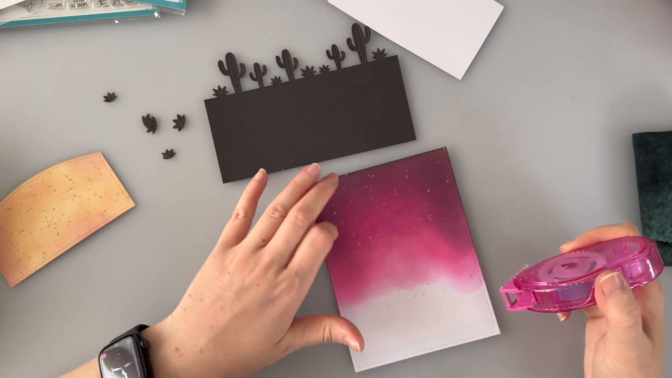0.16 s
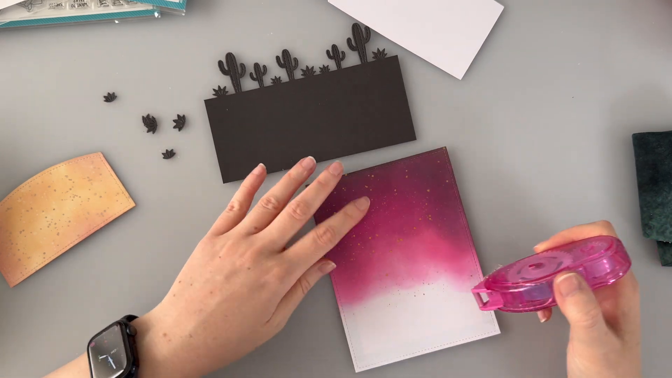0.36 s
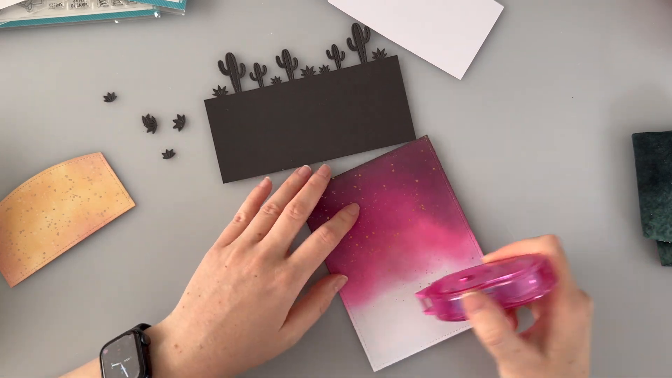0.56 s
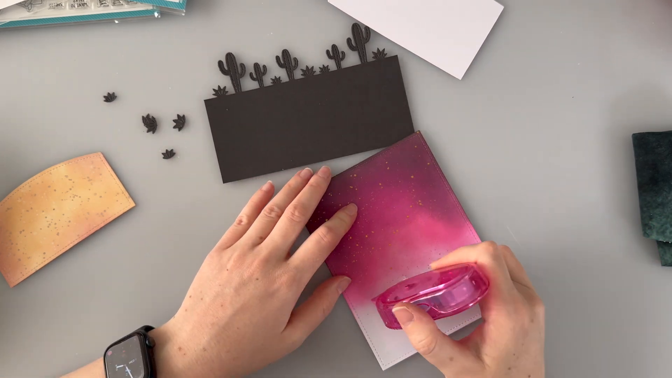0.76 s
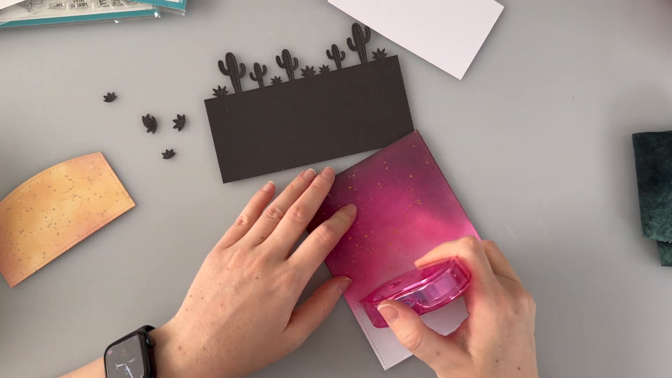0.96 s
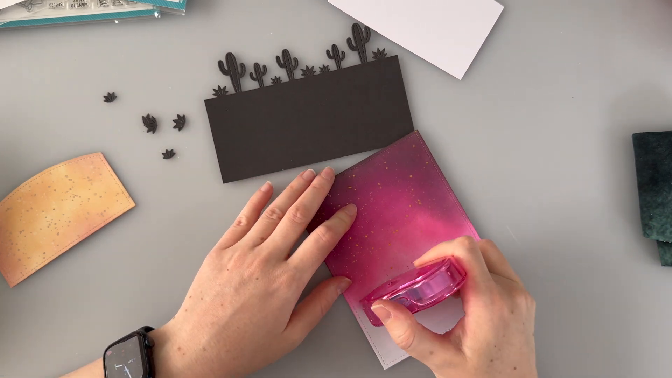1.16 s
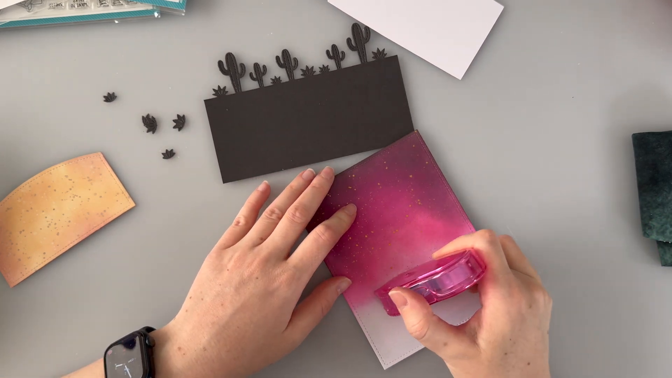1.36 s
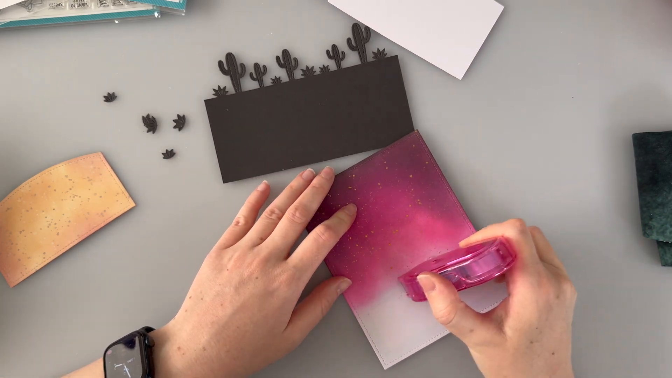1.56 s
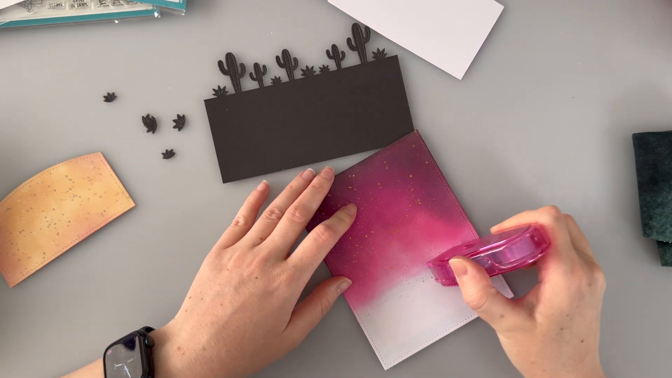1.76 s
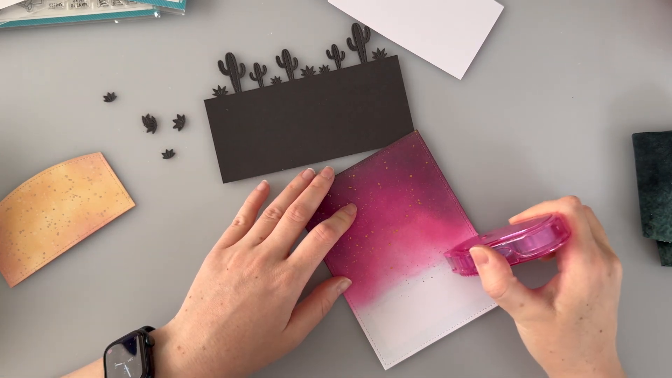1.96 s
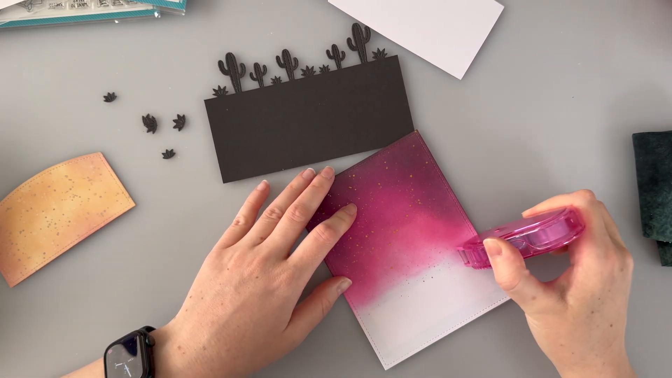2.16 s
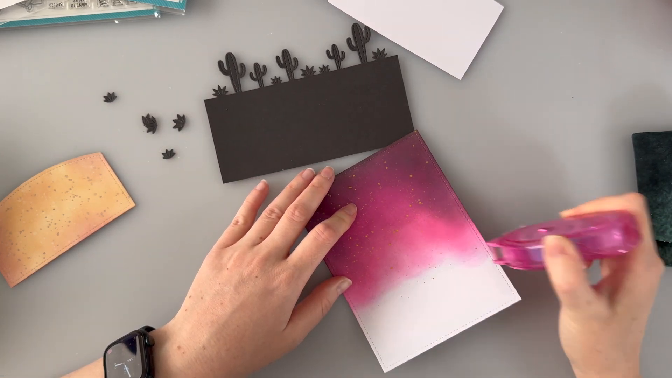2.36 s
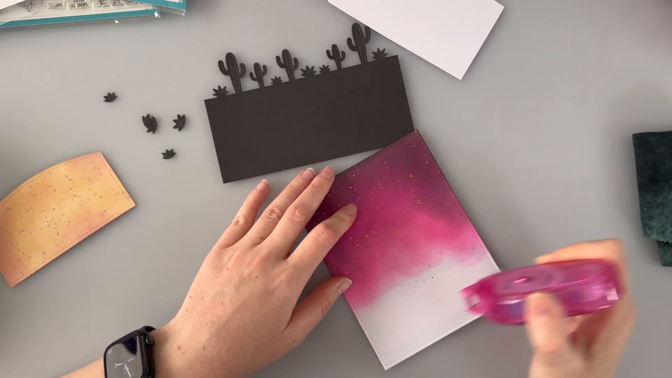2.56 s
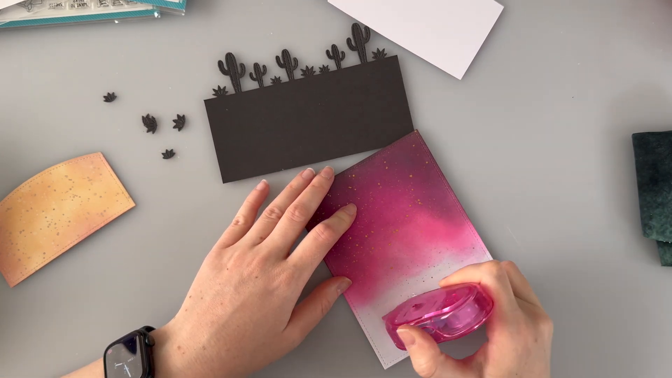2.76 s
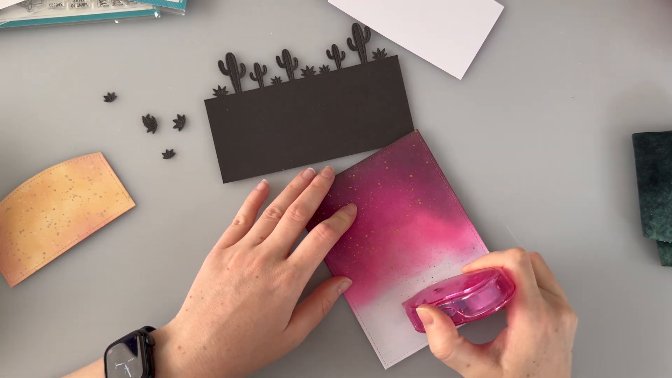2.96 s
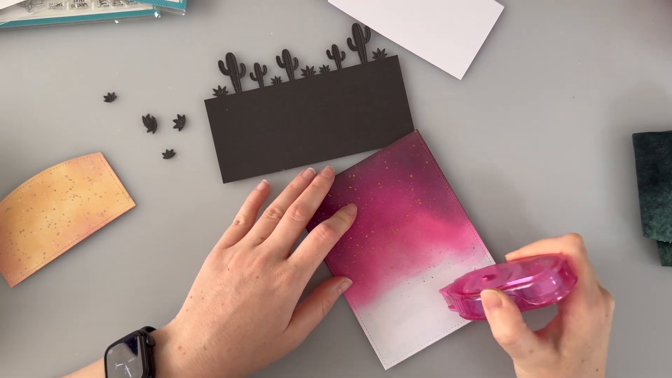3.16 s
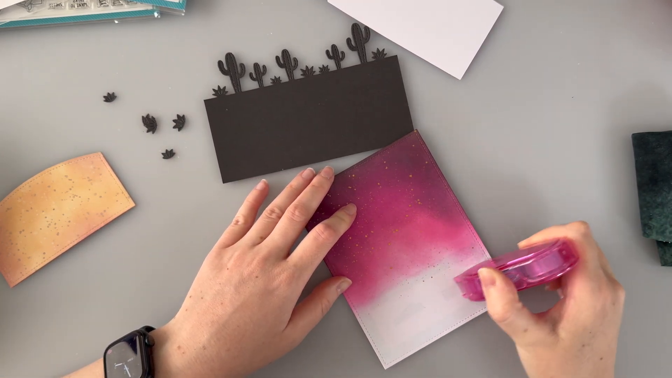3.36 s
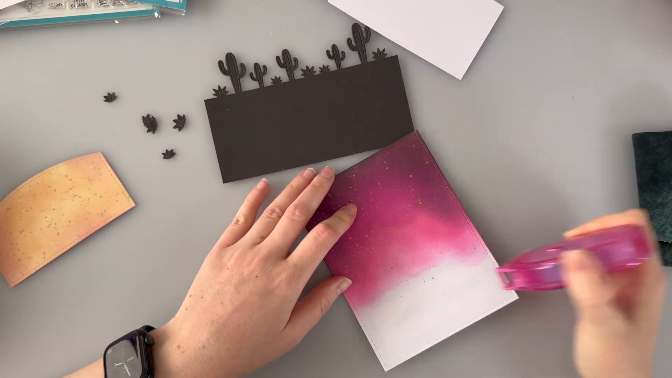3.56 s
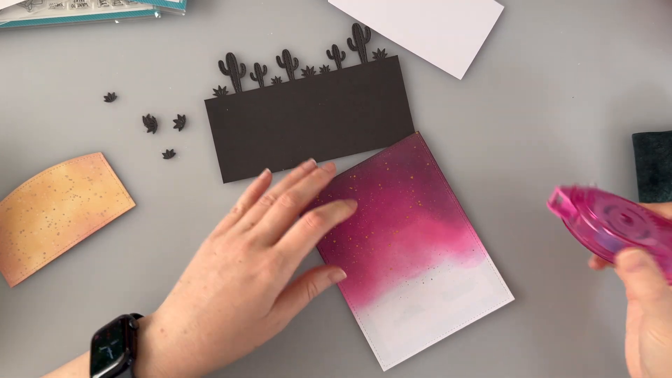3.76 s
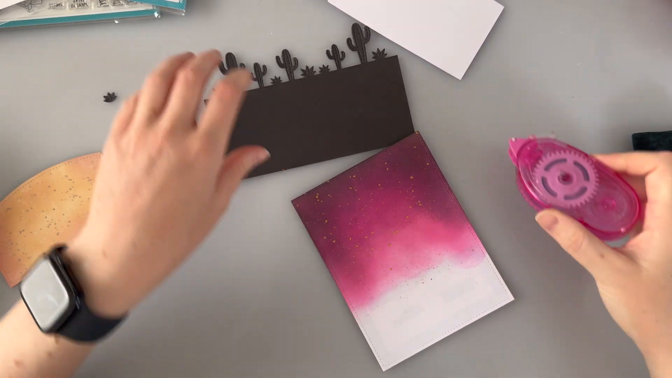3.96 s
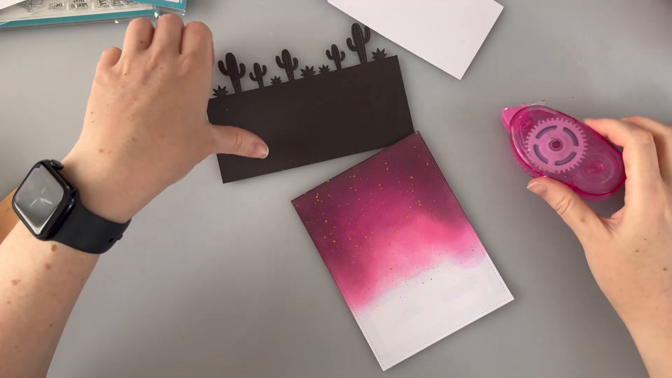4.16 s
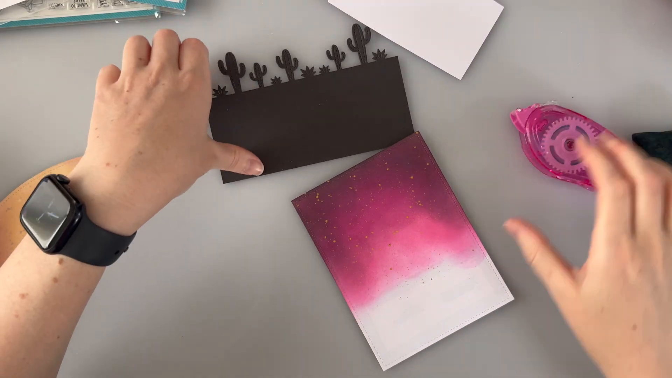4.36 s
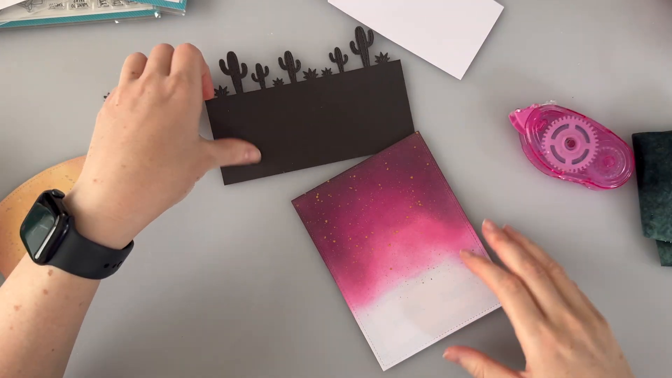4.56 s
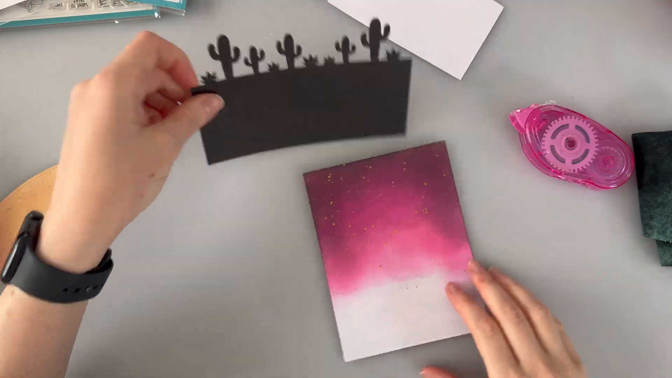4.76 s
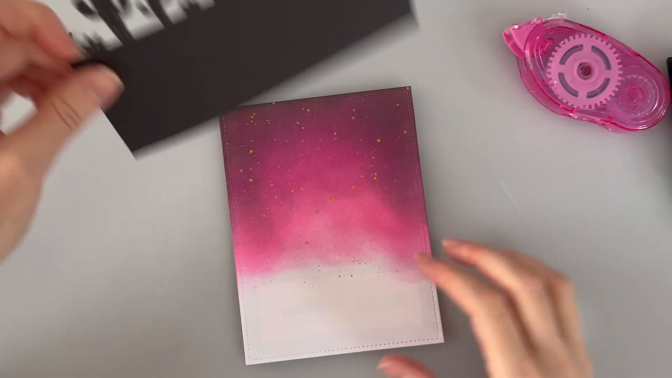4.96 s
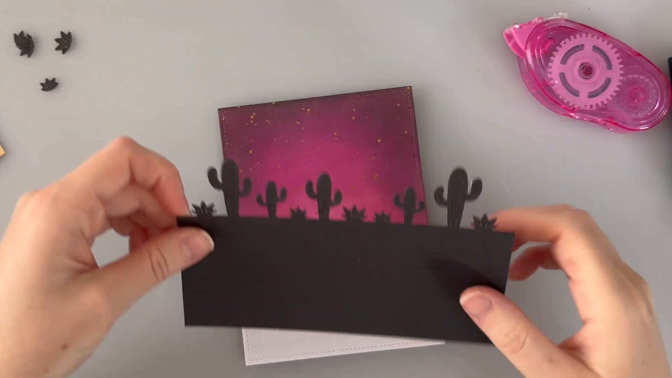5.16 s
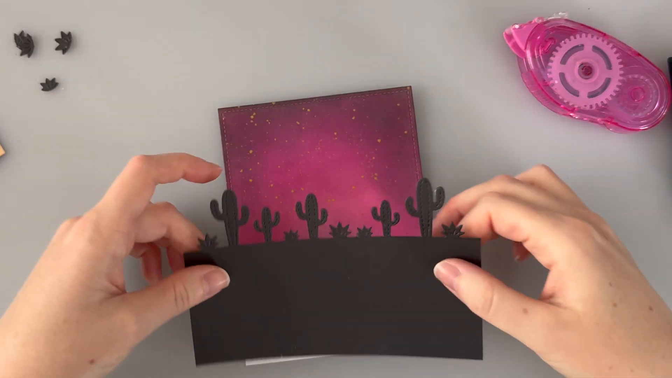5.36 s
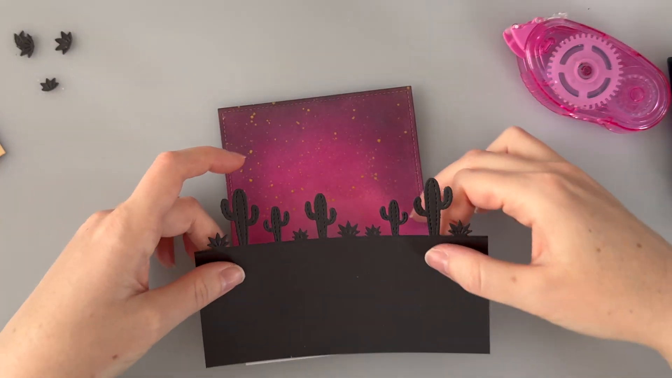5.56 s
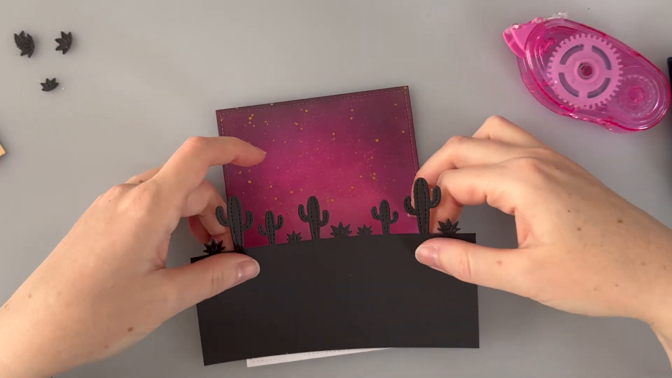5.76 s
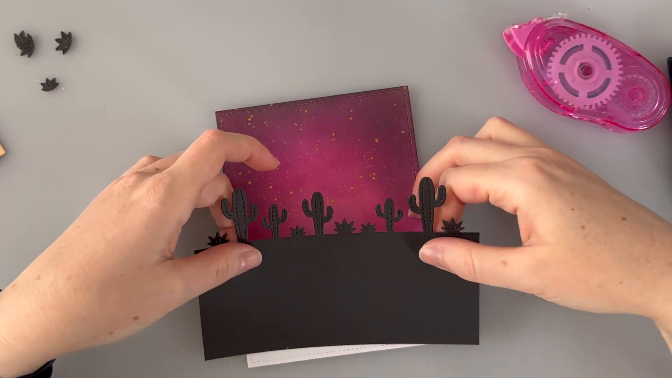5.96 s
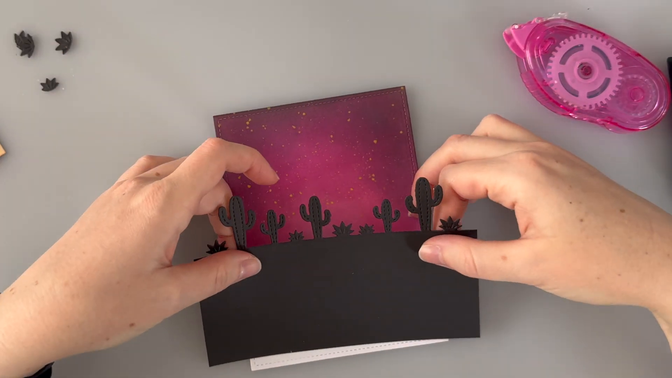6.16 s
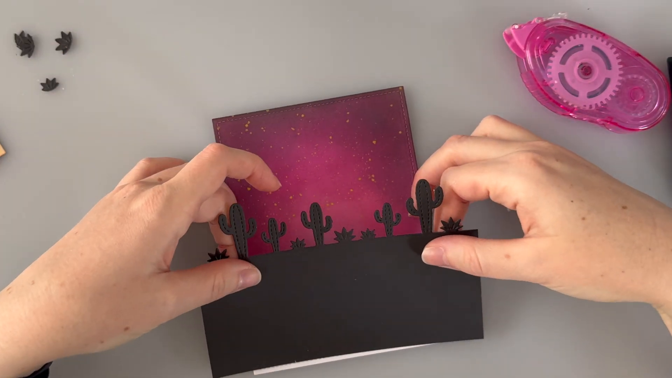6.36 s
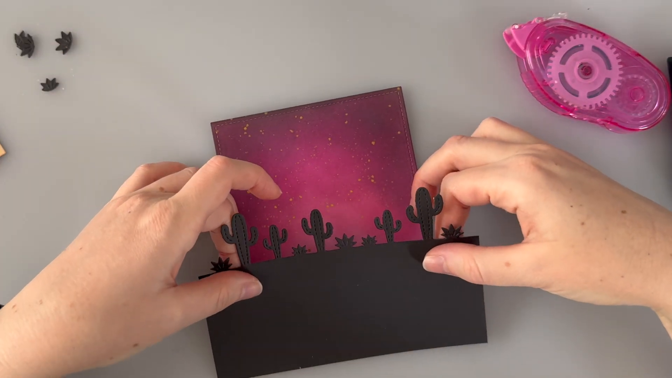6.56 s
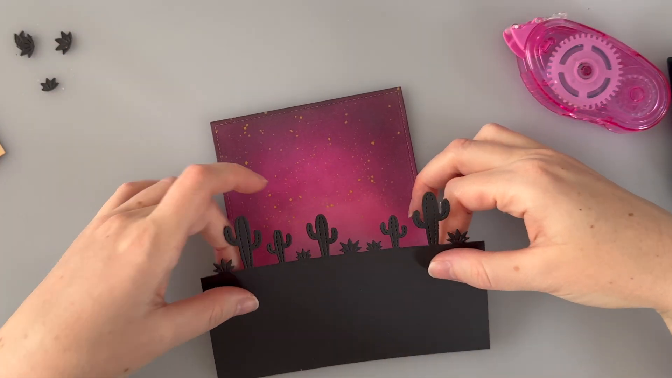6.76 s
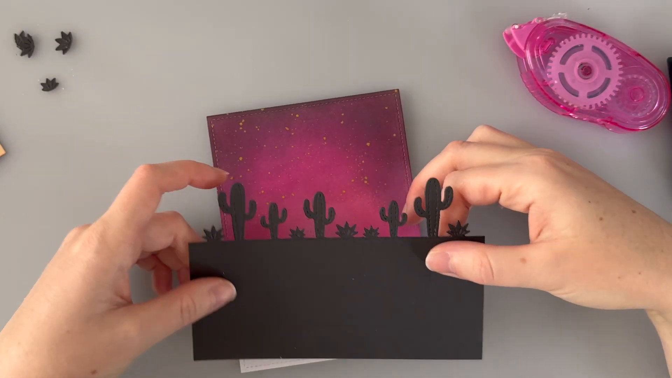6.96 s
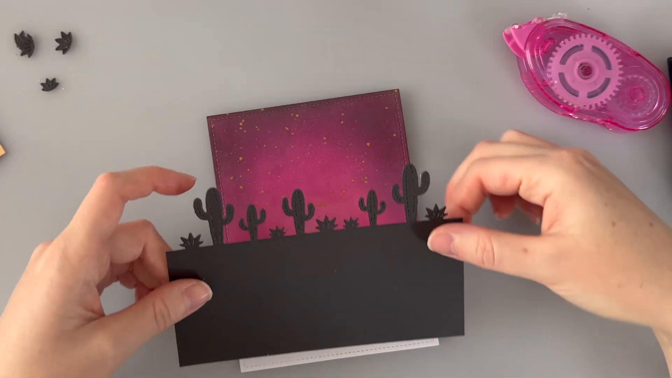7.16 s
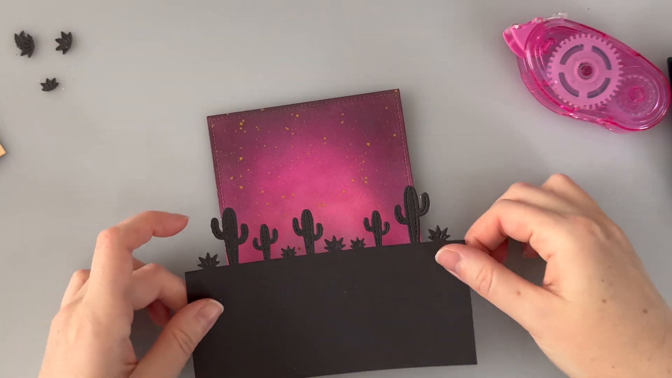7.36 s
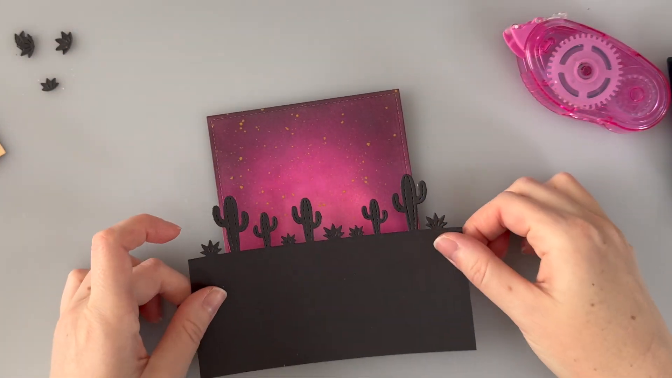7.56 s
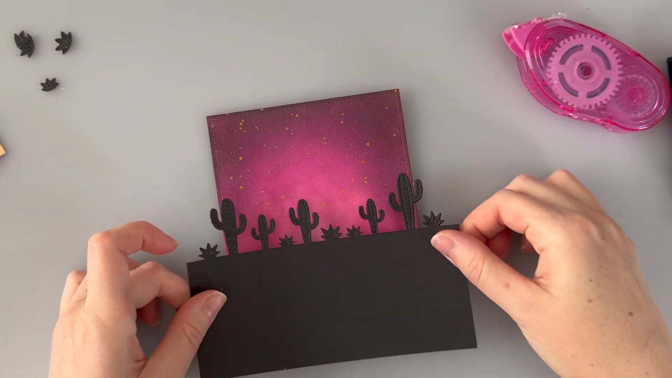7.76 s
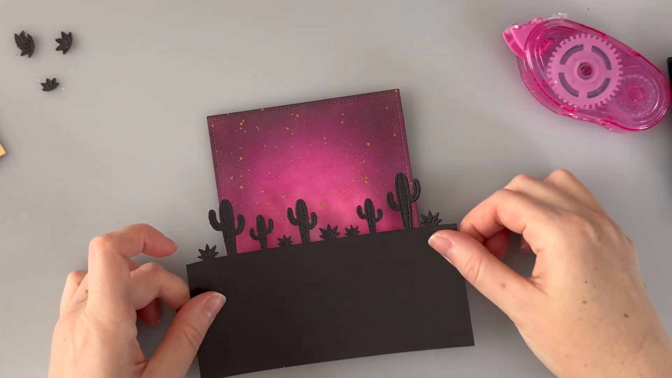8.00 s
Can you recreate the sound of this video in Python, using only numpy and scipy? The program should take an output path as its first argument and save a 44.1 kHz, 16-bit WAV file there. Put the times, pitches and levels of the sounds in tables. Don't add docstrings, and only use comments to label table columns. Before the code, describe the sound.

Indoors at a craft table, faint low air noise throughout. Paper brushes briefly aside, then very sharp, dry plastic clicks accelerate into a zipping ratchet, slow, and repeat in two shorter bursts with small knocks between. Hollow plastic with loose reels clatters onto the tabletop. Then thin card lifts, taps and slides gently, recorded close with a short room response.

```python
import sys
import numpy as np
from scipy import signal
from scipy.fft import rfft, irfft, next_fast_len
from scipy.io import wavfile
from scipy.ndimage import uniform_filter1d, map_coordinates

SR = 44100
rng = np.random.default_rng(int(sys.argv[2]) if len(sys.argv) > 2 else 0)


def store_pcm(level_fs):
    pcm = np.round(np.clip(level_fs, -1, 1) * 32767).astype(np.int16)
    wavfile.write(sys.argv[1], SR, np.atleast_2d(pcm).T)


def voltage_ratio(decibels):
    exponent = np.asarray(decibels, float) / 20
    return 10 ** exponent


N = 354123

# frequency_hz, density_db (per hertz)
RUMBLE_SPECTRUM = [(12, -36), (20, -9.5), (43, -5), (118, -2.5), (272, -11), (303, -9), (327, -15.5),
                   (445, -23), (511, -28.5), (800, -34), (1040, -72.5), (1760, -120)]
# frequency_hz, width_hz, level_db (over the rumble)
FAN_HUMS = [(301, 4.2, -12.5), (445, 29, -16.5)]
# frequency_hz, level_db
HISS_SPECTRUM = [(300, 3), (600, 2), (1500, -4), (3200, -9.5), (5500, -13.5), (8000, -10.5), (11000, -14),
                 (14000, -15), (15600, -23)]
# start_s, length_s, level_db
LEANS = [
    (-.2, 0.75, -53.5),
    (0.355, 0.83, -57.5),
    (1.037, 1.59, -50),
    (2.742, 0.59, -49.5),
    (3.215, 0.36, -51),
    (4.181, 0.96, -51.5),
    (5.015, 0.86, -54.5),
    (5.815, 1.28, -59),
    (6.812, 0.82, -57.5),
]
# start_s, length_s
DUCKS = [
    (2.3, 0.66),
    (3.0, .3),
    (3.5, .8),
]

# start_s, peak_db, pitch_hz, t60_s
DESK_THUMPS = [(1.9141, -28, 100, 0.08), (1.958, -37.5, 110.3, .06), (2.241, -40, 99, 0.1),
               (2.757, -40, 137.5, 0.17), (3.244, -38.5, 159, 0.11), (3.421, -38.5, 181, .06),
               (3.497, -36.5, 199, .06), (3.528, -38.5, 108, 0.057), (4.147, -44.5, 136, 0.16),
               (4.289, -29.5, 169, 0.084), (4.345, -39.5, 124, 0.24), (4.267, -42.5, 260, .05),
               (4.321, -40.5, 200, .06), (4.362, -41.5, 140, .07), (4.414, -47, 170, .06),
               (4.44, -48.5, 190, .06)]

# start_s, length_s, body_db, hiss_db (over body), free_span_hz
TURN_SLIDES = [
    (-0.12, 0.32, -56.5, -2, 1730),
    (.43, .1, -72.5, 1, 1740),
    (.62, 0.093, -71.5, 0.5, 4950),
]
TURN_FLICKS = [
    (0.407, 0.11, -67, -1.5, 1740),
]
# frequency_hz, level_db
SHEET_SPECTRUM = [(700, -18), (1300, -4.5), (1750, -9.5), (2300, -2.5), (3800, -9), (4850, -3),
                  (5600, -16.5), (8000, -40)]
# start_s, length_s, body_db, hiss_db (over body), free_span_hz
CARD_SLIDES = [(2.07, 0.094, -73, 19, 3676), (2.18, 0.097, -48, 5, 3410), (4.64, 0.14, -45.5, -24, 2297),
               (4.7, .2, -56.5, 2, 2220), (5.38, .14, -75, 10, 3187), (5.9, 1.9, -72, -4.5, 2500),
               (6.12, 0.1, -62.5, -25, 2460), (6.3, 0.13, -66.5, -17, 2440), (6.55, 0.16, -71, -10.5, 2520),
               (6.71, 0.066, -68, -12.5, 1598), (6.74, 0.096, -59, -7, 2940), (6.85, 0.098, -72, 7, 2300),
               (6.98, .16, -64, 2.5, 1480), (7.17, 0.19, -63, -2, 2150), (7.5, 0.084, -57.5, -19.5, 2890)]
CARD_FLICKS = [(4.531, 0.33, -61, 15, 4055), (5.092, 0.04, -56, -3.5, 3507), (5.215, 0.24, -65.5, 3, 1866),
               (5.34, 0.22, -58.5, -10, 3760), (5.52, 0.042, -71, -18, 1794), (5.57, 0.29, -64, -5, 3420),
               (5.66, 0.26, -77, -14.5, 2520), (6.015, 0.075, -60.5, -28, 2650),
               (6.488, 0.096, -65.5, -10, 2680), (6.96, 0.03, -62, 0, 1990), (7.39, 0.05, -63, -8, 2356),
               (7.506, 0.069, -58.5, -15, 2840)]
# frequency_hz, level_db
CARD_SPECTRUM = [(600, -28), (900, -8), (1800, -4.5), (2600, -5.5), (3600, -6.5), (4800, -10), (6000, -20),
                 (8000, -30.5)]
# frequency_hz, level_db
FIBRE_SPECTRUM = [(4000, -30), (6000, -7), (8300, 0), (10500, -4), (13000, -.5), (15400, -2.5),
                  (16300, -40)]
SLIDE_PEAK, FLICK_PEAK, STROKE_STEEP = 0.73, 0.17, 1.77

# start_s, length_s, level_db
TIP_PRESSES = [
    (1.15, 0.94, -56.5),
    (2.8, 0.23, -61.5),
    (3.37, 0.49, -62.5),
    (1.7, 0.07, -55),
    (3.45, 0.1, -55),
]
# frequency_hz, level_db
DRAG_SPECTRUM = [(150, -33), (300, 4), (600, -8), (1000, -10.5), (2500, -11), (6000, -15.5), (15000, -19)]

# start_s, peak_db, brightness_db, depth_db, t60_s
CARD_TAPS = [(0.412, -53, 1, 3, 0.0085), (1.0266, -53, -14.5, -23, 0.022), (1.0485, -58.5, -34, 2, 0.028),
             (1.0998, -61, -29, -12.5, 0.027), (4.5977, -49, -10.5, -3, 0.049),
             (4.6399, -30, -9.5, -28, 0.034), (5.101, -43.5, -6.5, -6.5, 0.019),
             (5.2161, -32.5, -11, -4.5, 0.0041), (5.2374, -67, 0, 16, 0.028), (5.2659, -57.5, 5, 13, 0.017),
             (5.5205, -57, -10, 5.5, 0.024), (5.5724, -49.5, -19, -22, 0.055),
             (5.5913, -72, 12, -17.5, 0.014), (5.7048, -52.5, -3, -1, 0.019), (5.7896, -70, 1, 3, 0.02)]
SHELL_CONTACTS = [(2.1606, -43, 2.5, -25.5, 0.0088), (2.3402, -34, -2.5, -10.5, 0.008),
                  (2.345, -29.5, -2, -5, 0.012), (2.7517, -37, -19.5, -2, 0.035),
                  (2.762, -34.5, -4.5, -7, 0.05), (3.24, -32.5, -18.5, -9.5, 0.039),
                  (3.2505, -43, 6.5, 6, 0.02), (3.7004, -46.5, -30, -24, 0.02),
                  (3.747, -36.5, -19, -34, 0.017), (3.8208, -53, -40.5, -0.5, 0.0194),
                  (3.9717, -60, -29.5, 9.5, 0.019), (4.1475, -23, -14, -5, 0.034),
                  (4.1663, -29.5, -12, 1, 0.023), (4.2664, -23.5, -12.5, -14, 0.06),
                  (4.2859, -19, -9, -18.5, 0.05), (4.2945, -14.5, -6, -14.5, 0.054),
                  (4.3203, -18.5, -12.5, -9, 0.022), (4.3385, -22, -6, -15, 0.03),
                  (4.3488, -31.5, -9, -12, 0.02), (4.407, -28.5, -16.5, -14, 0.023)]
PAWL_NUDGES = [
    (2.216, -48, 6, -15, .02),
    (2.231, -48, 8, -15, .02),
]
# frequency_hz, width_hz, level_db
SHELL_ON_DESK = [(1850, 550, 0.5), (3040, 410, -1), (3600, 84, 4), (4483, 2200, -4), (5200, 1100, -11.5)]

# start_s, peak_db, pitch_hz, t60_s
REEL_TICKS = [(1.9155, -34.5, 760, .012), (1.959, -27, 621, 0.015), (1.989, -30, 650, .014),
              (2.0085, -28, 693, 0.012), (2.04, -28.5, 600, 0.011), (3.533, -23, 920, 0.016),
              (3.966, -54.5, 1504, .008), (4.17, -36, 1500, 0.026), (4.33, -26.5, 1414, .03),
              (7.54, -49, 2920, 0.036), (2.341, -17, 3740, 0.0045), (2.3455, -24.5, 3400, 0.0056),
              (2.3535, -35, 3230, .006), (2.3564, -25, 2940, 0.005), (2.366, -17.5, 1920, 0.00307),
              (2.755, -45.5, 888, 0.012), (3.234, -34, 4310, 0.0054), (3.2399, -27.5, 1780, .014),
              (3.2461, -23, 1280, 0.0097), (3.2535, -28, 3490, 0.0065), (3.2609, -30.5, 1430, 0.017),
              (3.546, -22, 3800, 0.0051), (3.5518, -28, 3400, .006), (3.559, -28, 2960, 0.00585),
              (3.8206, -43.5, 1940, 0.01), (3.943, -56, 1443, 0.0091), (3.9725, -45, 1310, .015),
              (4.0023, -54.5, 1147, .012), (4.149, -23.5, 1275, .03), (4.1495, -23.5, 1902, 0.02),
              (4.211, -37.5, 1267, .03), (4.267, -29, 1150, .02), (4.276, -25, 4387, 0.011),
              (4.2868, -17, 4300, 0.0083), (4.292, -17, 2430, 0.0042), (4.2953, -12, 1870, 0.02),
              (4.2968, -13, 3065, 0.017), (4.3035, -22, 2193, .012), (4.321, -23, 1950, 0.0095),
              (4.3355, -21.5, 2134, 0.0077), (4.3383, -19.5, 1855, .014), (4.341, -21.5, 3133, .012),
              (4.349, -24, 1890, .012), (4.4, -26.5, 1850, 0.017), (4.4065, -26.5, 2896, 0.0105),
              (4.686, -42, 2130, 0.06), (4.722, -40, 2400, 0.03), (4.732, -37, 2830, 0.04),
              (4.735, -36.5, 2060, 0.038), (4.735, -47, 890, 0.036), (7.067, -50, 1726, 0.056),
              (5.271, -46, 1010, 0.024), (.333, -64, 2080, .02), (2.563, -63.5, 2298, .015),
              (3.213, -53, 2000, .012)]

# start_s, snap_db, faces_db, rim_db, cavity_db
LONG_PULL = [(1.205, -11.5, -29, -29.5, -26), (1.263, -7.5, -28, -26.5, -27.5),
             (1.3006, -9.5, -35, -24, -26), (1.342, -8, -26.5, -24.5, -26),
             (1.3631, -11.5, -26, -24.5, -29), (1.3833, -8, -23.5, -23.5, -29.5),
             (1.405, -9, -25.5, -26, -28.5), (1.4376, -8.5, -27.5, -22.5, -26),
             (1.4672, -8.5, -26.0, -26, -29.5), (1.5004, -6, -24.5, -24.5, -25),
             (1.5194, -11.5, -23, -28, -21), (1.5403, -9.5, -21, -23, -22.5),
             (1.5602, -12, -23, -25, -18.5), (1.5867, -7, -23, -20, -26), (1.609, -12, -24, -23, -19.5),
             (1.6294, -11, -17.5, -26.5, -26.5), (1.6468, -11.5, -22, -23, -19),
             (1.6649, -12, -17.5, -25, -22), (1.686, -14, -21.5, -23.5, -19.5),
             (1.7071, -13, -23, -23.5, -21.5), (1.7274, -15, -25.5, -25, -26.5),
             (1.7505, -14, -21, -29, -26.5), (1.769, -15, -21.5, -32.5, -29.5),
             (1.7873, -13.5, -26, -22, -34.5), (1.81, -14, -27, -26, -35),
             (1.8515, -11.5, -22.5, -32, -31.5),
             (1.9146, -12, -28.5, -29.5, -29), (1.9579, -10, -23.5, -38.5, -29.5),
            (1.9885, -8.5, -25, -31.5, -26), (2.006, -8, -26, -31.5, -27), (2.0392, -10, -31, -27.5, -28.0),
            (2.2409, -8.5, -26, -33.5, -25.5), (2.2556, -10.5, -26, -24, -20),
            (2.2692, -11.5, -29, -28.5, -23)]
SECOND_PULL = [(2.8366, -13.5, -25.5, -32, -25), (2.8521, -11, -20.5, -32.5, -26),
               (2.864, -10.5, -16.5, -29.5, -32), (2.8758, -10.5, -28.5, -27.5, -33.5),
               (2.8848, -7, -25.5, -27, -28), (2.8958, -10, -27, -25.5, -24.5),
               (2.9056, -13.5, -31.5, -24, -27.5), (2.9251, -11.5, -26, -25, -29),
               (2.9833, -9.5, -27, -29.5, -27.5), (3.0065, -10.5, -20.5, -26.5, -24.5),
               (3.0207, -9.5, -27.5, -26.5, -21), (3.032, -13.5, -21, -31.5, -19.5),
               (3.0439, -11.5, -27.5, -25.5, -21.5)]
THIRD_PULL = [(3.2912, -11.5, -25.5, -26.5, -28), (3.3224, -11, -21.5, -25, -25.5),
              (3.3411, -12, -25, -29, -29.5), (3.3557, -10.5, -27, -26.5, -22),
              (3.367, -10, -22.5, -28.5, -26), (3.3748, -9.5, -28.5, -26, -21.5),
              (3.382, -14.5, -21.5, -24.5, -21.5), (3.394, -12, -28, -26.5, -28),
              (3.4196, -15, -31, -24.5, -26.5), (3.4956, -11, -22, -34.5, -25.5),
              (3.5143, -11.5, -26, -27, -37.5), (3.5278, -7.5, -23.5, -31, -31)]
# frequency_hz, width_hz, level_db
PAWL = [(8150, 1100, -5.5), (12300, 950, -2), (13400, 1200, -2), (14500, 1100, 0), (15600, 900, -1)]
FACES = [(2140, 450, -1.5), (2760, 570, 1), (3400, 570, 0.5)]
RIM = [(4580, 660, 1), (5620, 1300, -5), (6160, 2100, -3.5)]
CAVITY = [(998, 91, -6.5), (1218, 130, -4), (1416, 150, -6)]
NECK = [(1410.5, 71, 0)]

# frequency_hz, t60_s, level_db
ROOM = [(200, 0.7, 2), (960, 0.26, -2), (1480, 0.3, 0.5), (1940, .3, -2.5), (4600, 0.37, -3),
        (5960, 0.28, 0.5), (8300, 0.35, -2.5), (10500, 0.48, -10),
        (12000, .29, -9), (15000, .26, -8), (15700, .24, -10), (16200, .2, -25)]
# frequency_hz, unshared_db
SPREAD = [(850, 2), (1300, 5.5), (2800, 4), (5000, 4.5), (10000, 8)]
# frequency_hz, likeness (0 to 1)
ALIKE = [(60, .9), (150, .92), (300, .6), (600, .87), (1400, .7), (3000, .68), (5500, .4), (7500, .9),
         (9000, .93), (11000, .93), (15000, .92)]
# frequency_hz, lead_rad
LEAD = [(20, 0), (700, -.3), (1400, -.6), (2100, -.3), (3300, .7), (6000, .6), (7600, 2.4), (8700, 3.1),
        (9600, 2.7), (11000, 2), (13000, 1.45), (15000, .9), (16500, .4)]
# frequency_hz, difference_db
LOUDER = [(30, 2), (150, 2), (350, 3), (700, 0), (1400, -1.3), (2800, -3), (5500, .6), (9000, 1),
          (15000, 0)]


def unit(x):
    return x / np.sqrt(np.mean(x ** 2) + 1e-20)


def along(points, hz):
    f, v = np.transpose(points)
    return np.interp(np.log(hz + 1), np.log(f + 1), v)


def wobble(rate_hz):
    knots = rng.standard_normal(int(N * rate_hz / SR) + 4)
    return map_coordinates(knots, [np.arange(N) * rate_hz / SR])


def filtered(x, response):
    m = next_fast_len(N + SR // 2)
    return irfft(rfft(x, m) * response(np.fft.rfftfreq(m, 1 / SR)), m)[..., :N]


def resonances(modes):
    def response(hz):
        total = 0
        for k, (centre_hz, width_hz, db) in enumerate(modes):
            damping = 1j * hz * width_hz
            total = total + (-1) ** k * voltage_ratio(db) * damping / (centre_hz * centre_hz - hz * hz + damping)
        return total / np.sqrt(np.mean(abs(total) ** 2))
    return response


def noise(spectrum, patchy_db):
    z = signal.stft(rng.standard_normal((2, N)), nperseg=512)[2]
    field = rng.standard_normal(z.shape[1:])
    field = uniform_filter1d(uniform_filter1d(field, 8, 0), 8, 1)
    pair = signal.istft(z * voltage_ratio(patchy_db * unit(field)), nperseg=512)[1][:, :N]
    return unit(filtered(pair, lambda hz: voltage_ratio(along(spectrum, hz))))


def swell(start, length, peak, steep):
    u = (np.arange(N) / SR - start) / length
    peak = np.clip(peak, .02, .98)
    ramp = np.minimum(u / peak, (1 - u) / (1 - peak))
    return np.sin(np.pi / 2 * np.clip(ramp, 0, 1)) ** steep


def bursts(times, levels_db, t60s, modes, rise, hold):
    out, t = np.zeros((2, N + SR)), np.arange(4096) / SR
    hz = np.fft.rfftfreq(len(t), 1 / SR)
    for s, db, t60 in zip(times, levels_db, np.broadcast_to(t60s, len(times))):
        fall_db = -60 * np.maximum(t - rise - hold, 0) / np.clip(t60, .002, .06)
        shape = np.minimum(t / rise, 1) * voltage_ratio(fall_db)
        scatter = np.array(modes) * [.02, 0, 0] + [0, 0, 2.5]
        struck = modes + rng.normal(0, 1, (len(modes), 3)) * scatter
        puff = shape * rng.standard_normal((2, len(t)))
        blow = irfft(rfft(puff) * resonances(struck)(hz))
        blow *= np.linalg.norm(shape) / np.linalg.norm(blow, axis=1, keepdims=True)
        out[:, round(s * SR):][:, :len(t)] += voltage_ratio(db) * blow
    return out[:, :N]


def air():
    hum = 0
    for hz, width_hz, db in FAN_HUMS:
        ringing = filtered(rng.standard_normal((2, N)), resonances([(hz, width_hz, 0)]))
        hum = hum + voltage_ratio(db) * unit(ringing)
    rumble = voltage_ratio(2.6 * wobble(22)) * noise(RUMBLE_SPECTRUM, patchy_db=0.95) + hum
    duck_db = -4 * sum(swell(s, length, 0.418, steep=0.85) for s, length in DUCKS)
    steady = voltage_ratio(-60.5 + duck_db)
    loaded = sum(voltage_ratio(db) * swell(s, length, 0.23, steep=0.78) for s, length, db in LEANS)
    return np.hypot(steady, loaded) * rumble + voltage_ratio(-72) * noise(HISS_SPECTRUM, patchy_db=2.0)


def desk():
    out, t = np.zeros(N + SR), np.arange(SR // 4) / SR
    for s, db, hz, t60 in DESK_THUMPS:
        cycles = hz * t + 2.1 * (1 - np.exp(-t / .0045))
        out[round(s * SR):][:len(t)] += voltage_ratio(db - 60 * t / t60) * np.sin(2 * np.pi * cycles)
    s, db, _, t60 = np.transpose(DESK_THUMPS)
    thud_modes = [(231.7, 310, 1.5), (520, 390, -9.5)]
    thud = bursts(s, db - 13.5, 0.66 * t60, thud_modes, rise=0.0022, hold=0.0037)
    return out[:N] * np.array([[1.3], [.1]]) + thud


def card(slides, flicks, colour, lift_db, spread):
    grain = voltage_ratio(1.0 * wobble(45) + 2.2 * wobble(400))
    hz, t, z = signal.stft(noise(colour, patchy_db=2.5), SR, nperseg=512)
    strokes = [(*row, SLIDE_PEAK) for row in slides] + [(*row, FLICK_PEAK) for row in flicks]
    loudest, span = np.transpose([(s + peak * length, span) for s, length, _, _, span, peak in strokes])
    nearest = abs(t[:, None] - loudest).argmin(axis=1)
    span_hz = uniform_filter1d(span[nearest], size=5)
    distance = np.log((hz[:, None] + 1) / span_hz) / spread
    lift = voltage_ratio(lift_db * np.exp(-distance ** 2))
    lifted_power = np.mean(abs(z * lift) ** 2, (0, 1))
    z *= lift / np.sqrt(lifted_power / np.mean(abs(z) ** 2, (0, 1)))
    body = unit(grain * signal.istft(z, SR, nperseg=512)[1][:, :N])
    hiss = unit(grain * noise(FIBRE_SPECTRUM, patchy_db=1.6))
    return sum(voltage_ratio(db) * swell(s, length, peak, STROKE_STEEP) * (body + voltage_ratio(hiss_db + 3.5) * hiss)
               for s, length, db, hiss_db, _, peak in strokes)


def roller():
    pressure = sum(voltage_ratio(db + 3) * swell(s, length, 0.32, steep=3.8) for s, length, db in TIP_PRESSES)
    return pressure * noise(DRAG_SPECTRUM, patchy_db=3.0)


def knocks(events, body):
    s, db, bright_db, depth_db, t60 = np.transpose(events)
    edge = [(8827, 1900, 0.5), (13500, 1200, -0.5)]
    deep = [(778, 430, -6.0), (1430, 790, -2)]
    dull = bursts(s, db - 6.0, t60, body, rise=0.00054, hold=0.00036)
    sharp = bursts(s, db + bright_db + 3, .9 * t60, edge, rise=.0004, hold=.0011)
    heavy = bursts(s, db + depth_db, t60, deep, rise=0.0012, hold=0.00023)
    return dull + sharp + heavy


def reels():
    out, t = np.zeros(N + SR), np.arange(2048) / SR
    for s, db, hz, t60 in REEL_TICKS:
        envelope = voltage_ratio(db + 2.0 - 60 * t / abs(t60)) * (1 - np.exp(-t * hz / 0.9))
        out[round(s * SR):][:len(t)] += envelope * np.sin(2 * np.pi * hz * t)
    return out[:N] * np.array([[1], [.3]])


def ratchet():
    teeth = LONG_PULL + SECOND_PULL + THIRD_PULL
    s, snap_db, faces_db, rim_db, cavity_db = np.transpose(teeth)
    chatter = bursts(s - .0002, snap_db - 2.5, 0.01, PAWL, rise=.0003, hold=0.00063)
    rebound = bursts(s + 0.00069, snap_db - 20, 0.0088, PAWL, rise=.0005, hold=0.0032)
    faces = bursts(s, faces_db - 3.5, 0.021, FACES, rise=0.0013, hold=0.0014)
    rim = bursts(s, rim_db - 1.0, 0.024, RIM, rise=.0008, hold=0.00041)
    cavity = bursts(s + .0005, cavity_db + 1, .005, CAVITY, rise=.0004, hold=.0003)
    neck = bursts(s + .001, cavity_db + 0.5, .005, NECK, rise=.0004, hold=.0003)
    return chatter + rebound + faces + rim + cavity + neck


def room(x):
    out, places = np.zeros((2, N)), np.arange(N) // 900 % 5
    for place in range(5):
        hz, t, z = signal.stft(rng.standard_normal((2, SR // 2)), SR, nperseg=256)
        t60, level_db = (along(np.array(ROOM)[:, [0, k]], hz)[:, None] for k in (1, 2))
        z[1] *= voltage_ratio(along(SPREAD, hz))[:, None]
        tail = signal.istft(z * voltage_ratio(level_db - 60 * t / t60), SR, nperseg=256)[1]
        late = np.pad(x[:1] * (places == place), ((0, 0), (200, 0)))
        out += signal.oaconvolve(late, tail / np.linalg.norm(tail[0]), axes=1)[:, :N]
    return out


def ports(pair):
    def mix(hz):
        angle = np.arccos(np.clip(along(ALIKE, hz), -1, 1)) / 2
        return np.array([np.cos(angle), np.sin(angle)])

    common, apart = filtered(pair, mix)
    both, half = np.array([common + apart, common - apart]), np.array([[.5], [-.5]])
    return filtered(both, lambda hz: np.exp(1j * half * along(LEAD, hz)) * voltage_ratio(half * along(LOUDER, hz)))


def scene():
    background = air() + desk()
    inked = card(TURN_SLIDES, TURN_FLICKS, SHEET_SPECTRUM, lift_db=15.5, spread=0.14)
    slides = inked + card(CARD_SLIDES, CARD_FLICKS, CARD_SPECTRUM, lift_db=6.5, spread=0.27)
    taps = knocks(CARD_TAPS, [(2110, 2070, 1.1), (4030, 1500, 8.1)])
    hits = taps + knocks(SHELL_CONTACTS + PAWL_NUDGES, SHELL_ON_DESK) + ratchet()
    notes = reels()
    answer = room(voltage_ratio(-9.5) * hits + voltage_ratio(-13.5) * notes + voltage_ratio(-28.5) * slides)
    return ports(background + slides + roller() + hits + notes + answer)


def roll_off(x):
    return signal.sosfilt(signal.butter(12, 16970, fs=SR, output="sos"), x)


def record(dry):
    dull = filtered(dry, lambda hz: hz ** 4 / (hz ** 4 + 32 ** 4) / (1 + (hz / 15900) ** 60))
    rounded = dull / (1 + abs(dull / .8) ** 4) ** (1 / 4)
    return roll_off(rounded)


dry = scene()
out = record(dry)
store_pcm(out)
```